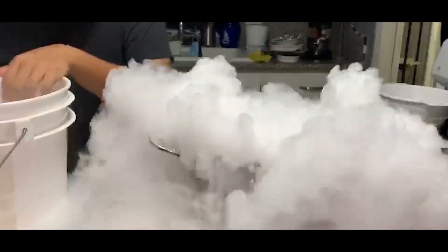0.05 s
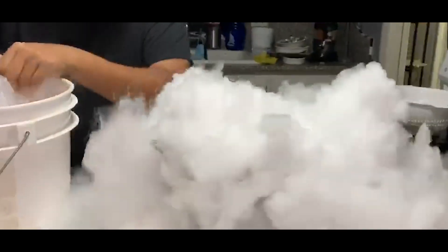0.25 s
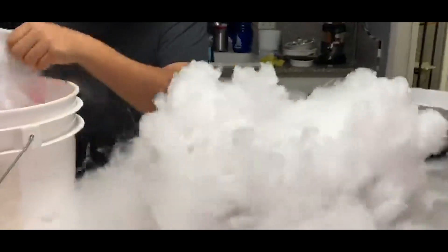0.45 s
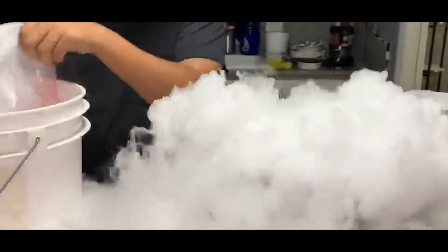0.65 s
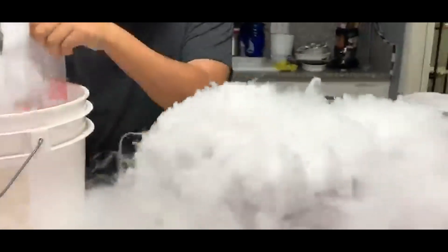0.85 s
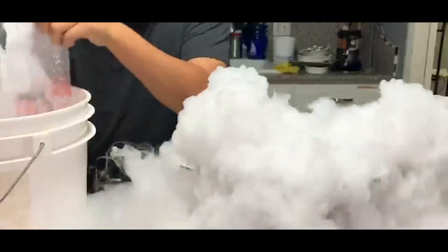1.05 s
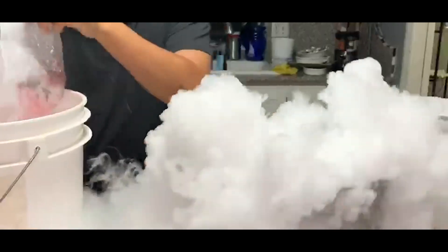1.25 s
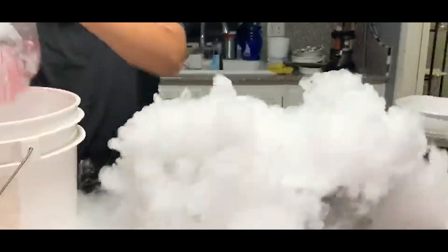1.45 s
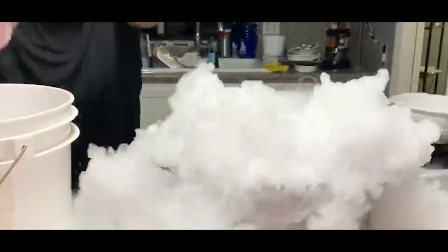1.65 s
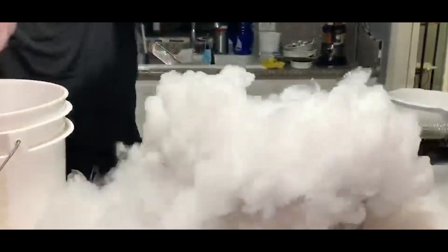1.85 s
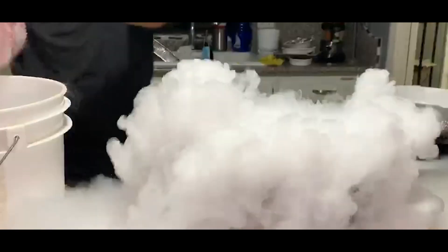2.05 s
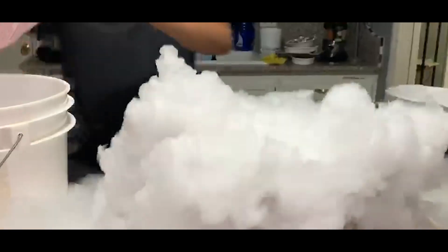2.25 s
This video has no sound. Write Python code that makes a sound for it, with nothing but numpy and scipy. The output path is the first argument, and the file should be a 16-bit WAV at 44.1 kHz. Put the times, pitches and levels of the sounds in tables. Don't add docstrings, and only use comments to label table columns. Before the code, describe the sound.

Thick bubbling of dry ice in a pot, with lumps in a bag clattering against a plastic bucket.

```python
import sys
import numpy as np
from scipy import signal
from scipy.fft import rfft, irfft
from scipy.io import wavfile
from scipy.ndimage import uniform_filter1d

SR = 44100
rng = np.random.default_rng(int(sys.argv[2]) if len(sys.argv) > 2 else 0)


def voltage_ratio(decibels):
    exponent = np.asarray(decibels, float) / 20
    return 10 ** exponent


def int16_out(signal):
    q = np.round(np.clip(np.atleast_2d(signal).T, -1, 1) * 32767)
    wavfile.write(sys.argv[1], SR, q.astype(np.int16))


N = 101429

# pitch_hz, level_db (per Hz)
BOIL_COLOUR = [(150, -6.5), (250, 1), (350, 1), (500, -2.5), (800, -1), (1100, -6.5), (1800, -16.5),
               (4500, -24.5)]
# start_s, peak_db, pitch_hz
GLUGS = [(0.953, -32, 880), (1.001, -30, 896), (1.104, -24, 985), (1.141, -37, 950), (1.232, -30, 1020),
         (1.245, -25, 346), (1.283, -23.5, 975), (1.352, -34, 2010), (1.527, -29, 687), (1.6, -34, 1900),
         (1.638, -26.5, 710), (1.648, -27.5, 1114), (1.66, -24, 940), (1.692, -26.5, 1730),
         (1.735, -28, 880), (1.757, -30, 693), (1.796, -29, 985), (1.826, -26, 743), (1.836, -33, 1720),
         (1.896, -28, 1300), (1.938, -28, 870), (1.962, -43, 663), (2.028, -29, 870), (2.12, -30.5, 980),
         (2.183, -28, 830), (2.201, -27, 1000), (2.21, -24, 800), (2.281, -25, 960), (1.363, -22, 990),
         (1.378, -32, 1250), (1.393, -38, 330), (1.425, -27, 1042), (1.454, -29, 297), (1.459, -27.5, 1240),
         (1.576, -25.5, 900), (1.695, -24.5, 784), (1.814, -21, 718), (1.836, -26, 346), (1.843, -22, 990),
         (1.904, -26.5, 1070), (1.904, -30.5, 2230), (1.936, -29, 1810), (1.993, -32, 2200),
         (2.014, -24, 895), (2.033, -30.5, 2270), (2.122, -24, 340), (2.135, -26.5, 1670),
         (2.222, -19.5, 895), (2.24, -16, 940), (2.241, -27, 2270), (2.278, -28, 2080)]
# start_s, peak_db, brightest_hz, scrape_s, spread_octaves
KNOCKS = [(0.004, -28, 194, 0.004, 0.39), (0.053, -26, 231, 0.0022, 0.27), (0.205, -11.5, 1200, 0.012, 1.2),
          (0.212, -6.5, 557, 0.0027, 0.74), (0.222, -16, 1500, 0.0016, 1.2),
          (0.234, -16, 198, 0.0082, 0.88), (0.254, -11, 920, 0.001, 0.41), (0.259, -22, 1500, 0.0036, 0.6),
          (.297, -7.5, 345, 0.0047, 0.5), (.301, -10, 750, 0.0076, 0.19), (0.305, -9, 190, 0.0048, 0.49),
          (.317, -3, 1780, 0.006, 1.46), (.319, -17, 230, 0.0054, 1), (.326, -13, 207, 0.0029, 0.48),
          (0.341, -10, 1700, 0.006, 0.37), (0.355, -17.5, 196, 0.024, 0.86),
          (0.374, -35, 1730, 0.0033, 0.32), (0.397, -21.5, 1000, 0.011, 0.26),
          (0.403, -22.5, 252, 0.014, 0.5), (0.4417, -5, 1090, 0.0006, 0.42),
          (0.447, -27, 1000, 0.0043, 0.77), (0.47, -19, 1620, 0.0054, 0.19), (0.474, -22, 586, 0.004, 0.77),
          (0.518, -13.5, 1150, 0.0051, 0.43), (0.52, -22, 2000, 0.004, 0.4),
          (0.524, -27.5, 228, 0.004, 0.28), (0.584, -25.5, 235, 0.0038, 0.58),
          (0.651, -17, 780, 0.0086, 0.81), (0.661, -29.5, 347, 0.0063, 0.4),
          (0.685, -24.5, 230, 0.0029, 0.77), (0.744, -20, 720, 0.012, 0.3), (0.661, -11, 1200, 0.013, 0.8),
          (0.664, -20, 2000, 0.0048, 0.36), (0.722, -13.5, 870, 0.0052, 1.7),
          (0.825, -17, 2030, 0.0026, 0.46), (0.83, -29.5, 845, 0.0048, 0.39),
          (1.173, -27.5, 244, 0.0023, 0.4)]
# mode_hz, level_db, t60_s
BUCKET_MODES = [(123.6, -1.5, 0.064), (145, -7, 0.092), (195.6, -5.5, 0.067), (231, 2, 0.11),
                (345, -3, 0.039), (595, 0.5, 0.053), (720, -2.5, 0.043), (861, 0, 0.022),
                (981, -0.5, 0.023), (1200, 4, 0.021), (1480, -1.5, 0.021), (1700, 4.5, 0.051),
                (1900, 5, 0.022), (2200, 8.5, 0.017)]
# start_s, peak_db, brightest_hz, length_s
SNAPS = [(0.035, -18, 4800, 0.0044), (0.0475, -18.5, 10400, 0.0041), (0.0583, -23, 10400, 0.0035),
         (0.1084, -22, 3870, 0.0047), (0.2604, -19, 10000, 0.0041), (0.2974, -17, 11600, 0.0045),
         (0.316, -16.5, 4170, 0.0086), (0.432, -20.5, 7000, 0.0041), (0.4447, -15, 11200, 0.0036),
         (0.446, -7.5, 11400, 0.0044), (0.453, -17, 4660, 0.0028), (0.483, -16.5, 7000, 0.0047),
         (0.53, -20, 4200, 0.002), (0.593, -27, 4500, 0.0024), (0.795, -29, 3000, 0.0035),
         (0.91, -37, 11000, 0.0023), (0.956, -15.5, 3860, 0.002), (1.084, -27.5, 9930, 0.0018),
         (1.105, -27, 4800, 0.0051), (1.115, -20, 10000, 0.0023), (1.1722, -14.5, 6200, 0.002),
         (1.176, -21, 4600, 0.0023), (1.449, -29, 4220, 0.0039), (1.545, -31, 3500, 0.0028),
         (1.578, -30, 10900, 0.0023), (1.619, -32.5, 4000, 0.0028), (1.681, -25, 13100, 0.0031),
         (1.97, -31.5, 11000, 0.0027)]
# freq_hz, gain_db
SNAP_COLOUR = [(1500, -19), (3000, 12), (5000, 6), (8000, 8), (11000, 9), (16000, 4)]
# time_s, level_db
DRAG = [
    (0.0, -40.5),
    (0.12, -36),
    (0.26, -29),
    (0.38, -29.5),
    (0.6, -33),
    (0.75, -37.5),
    (1.55, -49),
    (2.0, -47),
    (2.14, -52),
    (2.3, -56),
]
# freq_hz, level_db (per Hz)
RUSTLE_COLOUR = [(100, 14.5), (300, 16.5), (800, 19.5), (2000, 15), (4000, 9), (6000, 5), (9000, 8.5),
                 (16000, 3.5)]
# freq_hz, level_db (per Hz)
WASH_COLOUR = [(25, 12), (60, 7.5), (120, 9.5), (350, 4.5), (900, -3), (2000, -12.5), (5000, -16.5),
               (16000, -27)]
# freq_hz, t60_s
KITCHEN_DECAY = [(150, 0.18), (1000, 0.18), (4000, 0.22), (12000, 0.092)]
# freq_hz, likeness (0 to 1)
LIKENESS = [(60, 0.94), (380, 0.97), (600, 0.33), (1100, 0.47), (1800, 0.035), (2800, 0.32), (4300, 0.79),
            (6000, 0.26)]
# freq_hz, gain_db
OVERALL_TONE = [(10, -60), (30, -23), (55, 0.5), (100, -0.5), (15700, 1.5), (16100, -30), (17000, -39)]


def evened(x):
    return x / np.sqrt(np.mean(x ** 2) + 1e-20)


def read(points, hz):
    f, value = np.transpose(points)
    return np.interp(np.log(hz + 1), np.log(f + 1), value)


def add(mix, start_s, sound):
    part = mix[max(round(start_s * SR), 0):][:len(sound)]
    part += sound[:len(part)]


def coloured(x, points):
    return irfft(rfft(x) * voltage_ratio(read(points, np.fft.rfftfreq(N, 1 / SR))), N)


def paired(near, far):
    same = np.clip(read(LIKENESS, np.fft.rfftfreq(N, 1 / SR)), 0, 1)
    right = same * rfft(near) + np.sqrt(1 - same ** 2) * rfft(far)
    return np.array([near, irfft(right, N)])


def bubble(hz, cycles, rise):
    u = np.arange(0, 4, hz / cycles / SR)
    envelope = (1 - np.exp(-u / 0.072)) * np.exp(-1.5 * u)
    return envelope * np.sin(2 * np.pi * cycles * (u + rise * u ** 2 / 2))


def boil():
    bubbles_per_s, spread_db, boil_db = 1800, 2.5, -41
    swarm_cycles, swarm_rise = 4.4, 0.1484
    glug_cycles, glug_rise, glug_db = 8.1, 0.083, -4.5
    pitches = np.geomspace(160, 4500, 48)
    size = voltage_ratio(spread_db * np.minimum(rng.exponential(1, N), 4))
    size = size * (rng.random(N) < bubbles_per_s / SR)
    kind = rng.integers(0, len(pitches), N)
    shape = rng.uniform(0.59, 1.63, (len(pitches), 2))
    out = np.zeros(N)
    for k, hz in enumerate(pitches):
        grain = bubble(hz, swarm_cycles * shape[k, 0], swarm_rise * shape[k, 1])
        grain = voltage_ratio(read(BOIL_COLOUR, hz)) * hz * grain
        out += signal.oaconvolve(size * (kind == k), grain)[:N]
    out = voltage_ratio(boil_db) * evened(out)
    for start_s, peak_db, hz in GLUGS:
        glug = bubble(hz, glug_cycles * np.sqrt(hz / 900), glug_rise)
        add(out, start_s, voltage_ratio(peak_db + glug_db) * glug)
    return out


def knocks():
    detune, blow_db, blow_cycles, scrape_db, knock_db = 0.024, 1.5, 0.78, -5.5, -1.5
    out, t = np.zeros(N), np.arange(9000) / SR
    noises = rng.standard_normal((len(KNOCKS), 2500))
    for (start_s, peak_db, top_hz, scrape_s, spread), noise in zip(KNOCKS, noises):
        ring = np.zeros(len(t))
        for k, (hz, mode_db, t60) in enumerate(BUCKET_MODES):
            off_db = 3.3 * (np.log2(hz / top_hz) / spread) ** 2
            mode = np.sin(2 * np.pi * hz * (1 + detune * noise[-k - 1]) * t)
            ring += (-1) ** k * voltage_ratio(mode_db - 60 * t / t60 - off_db) * mode
        blow = np.minimum(t * top_hz * 2, 1) * np.exp(-t * top_hz / blow_cycles)
        blow = blow * np.sin(2 * np.pi * top_hz * t)
        ring = ring / abs(ring).max() + voltage_ratio(blow_db) * blow
        u = t[:len(noise)] / max(scrape_s, .0005)
        scrape = u * np.exp(-3 * u) * noise
        scraped = signal.fftconvolve(ring, scrape / np.linalg.norm(scrape))[:len(t)]
        hit = ring + voltage_ratio(scrape_db) * scraped
        add(out, start_s, voltage_ratio(peak_db + knock_db) * hit / abs(hit).max())
    return out


def snaps():
    snap_db, focus_db_per_octave2, skirt_db, attack_s = -6, 7, 7, 0.0004
    out, t = np.zeros(N), np.arange(900) / SR
    hz = np.fft.rfftfreq(len(t), 1 / SR) + 1
    noises = rng.standard_normal((len(SNAPS), len(t)))
    for (start_s, peak_db, top_hz, length_s), noise in zip(SNAPS, noises):
        focus_db = np.minimum(focus_db_per_octave2 * np.log2(hz / top_hz) ** 2, skirt_db)
        noise = evened(irfft(rfft(noise) * voltage_ratio(-focus_db), len(t)))
        envelope = voltage_ratio(peak_db + snap_db - 20 * t / max(length_s, .0003)) * np.minimum(t / attack_s, 1)
        add(out, start_s, envelope * noise)
    return coloured(out, SNAP_COLOUR)


def rustle():
    rustle_db, flicker_db = 4.5, 2
    cracks_per_s, crack_spread_db, crack_db = 880, 1.5, -14.5
    flicker = evened(uniform_filter1d(rng.standard_normal(N), 500))
    size = voltage_ratio(crack_spread_db * np.minimum(rng.exponential(1, N), 5))
    cracks = size * (rng.random(N) < cracks_per_s / SR * voltage_ratio(3.5 * flicker))
    burst = np.exp(-np.arange(120) / 114.0)
    cracks = signal.oaconvolve(cracks, burst)[:N] * rng.standard_normal(N)
    crackle = voltage_ratio(crack_db) * evened(cracks)
    hiss = rng.standard_normal((2, N)) * voltage_ratio(flicker_db * flicker)
    near, far = (evened(coloured(h + crackle, RUSTLE_COLOUR)) for h in hiss)
    drag_db = np.interp(np.arange(N) / SR, *np.transpose(DRAG))
    return voltage_ratio(rustle_db + drag_db) * paired(near, far)


def wash():
    wash_db, patch_db = -43, 2.5
    hz, _, z = signal.stft(rng.standard_normal((2, N + 1024)), SR, nperseg=1024, noverlap=768)
    patches = uniform_filter1d(rng.standard_normal(z.shape[1:]), 12, 0)
    patches = evened(uniform_filter1d(patches, 10, 1))
    z = z * voltage_ratio(read(WASH_COLOUR, hz)[:, None] + patch_db * patches)
    noise = signal.istft(z, nperseg=1024, noverlap=768)[1]
    return voltage_ratio(wash_db) * evened(paired(*noise[:, :N]))


def kitchen(x):
    taps = rng.choice([-1., 1.], (2, SR // 2)) * (rng.random((2, SR // 2)) < .05)
    taps[:, :150] = 0
    hz, t, z = signal.stft(taps, SR, nperseg=256)
    tail = signal.istft(z * voltage_ratio(-60 * t / read(KITCHEN_DECAY, hz)[:, None]), SR, nperseg=256)[1]
    return paired(*signal.fftconvolve(x[None], tail / np.linalg.norm(tail[0]), axes=1)[:, :N])


def scene():
    bag_wet_db, pot_wet_db, bag_lag_s = -7, -4.5, 0.00021
    pot, bag = boil(), knocks() + snaps()
    left = bag[None] + voltage_ratio(bag_wet_db) * kitchen(bag) + rustle()
    lag = np.exp(-2j * np.pi * np.fft.rfftfreq(N, 1 / SR) * bag_lag_s)
    left = np.array([left[0], irfft(rfft(left[1]) * lag, N)])
    return left + pot[None] + voltage_ratio(pot_wet_db) * kitchen(pot) + wash()


def thinned(pair):
    weak_db, weak_tilt_db, weak_jitter_db, sudden_db = -8.5, 0.36, 3.5, 11
    band_hz, thin_from_hz, edge_hz = 689.06, 6200, 15860
    mid_side = np.array([pair[0] + pair[1], pair[0] - pair[1]]) / 2
    hz, _, z = signal.stft(mid_side, SR, nperseg=1024, noverlap=768)
    band = (hz // band_hz).astype(int)
    block = (np.arange(z.shape[2]) + 2) // 4
    power = np.add.reduceat(abs(z) ** 2, np.flatnonzero(np.diff(band, prepend=-1)), axis=1)
    starts = np.flatnonzero(np.diff(block, prepend=-1))
    treble = power[:, 5:].sum((0, 1))
    jump = treble / (uniform_filter1d(np.roll(treble, 6), 5) + 1e-20)
    sudden = np.maximum.reduceat(jump, starts) > voltage_ratio(sudden_db)
    power = np.add.reduceat(power, starts, axis=2)
    jitter = evened(uniform_filter1d(rng.standard_normal(power.shape), size=3, axis=2))
    tilt_db = weak_tilt_db * np.arange(power.shape[1])[:, None]
    limit = voltage_ratio(2 * (weak_db + tilt_db + weak_jitter_db * jitter))
    weak = (power < limit * power[::-1])[:, band] & (hz > thin_from_hz)[:, None]
    weak = weak | (hz > edge_hz)[:, None]
    kept = z * ~(weak & ~sudden)[:, :, block]
    mid, side = signal.istft(kept, nperseg=1024, noverlap=768)[1][:, :N]
    return np.array([mid + side, mid - side])


def top_cut(x):
    return signal.sosfilt(signal.butter(12, 16980, fs=SR, output="sos"), x)


def record(dry):
    cross_hz, cross_width_hz, in_step_hz, turn_hz, ceiling = 6190, 380, 11000, 4900, 0.8
    hz = np.fft.rfftfreq(N, 1 / SR)
    z = rfft(dry, axis=1) * voltage_ratio(read(OVERALL_TONE, hz))
    top = 0.9 / (1 + np.exp(-np.clip((hz - cross_hz) / cross_width_hz * 4, -50, 50)))
    turned = z[0] * np.exp(2j * np.pi * (hz - in_step_hz) / turn_hz)
    right = np.sqrt(1 - top) * z[1] + np.sqrt(top) * turned
    pair = irfft(np.array([z[0], right]), N)
    limited = ceiling * np.tanh(pair / ceiling)
    return top_cut(thinned(limited))


dry = scene()
out = record(dry)
int16_out(out)
```